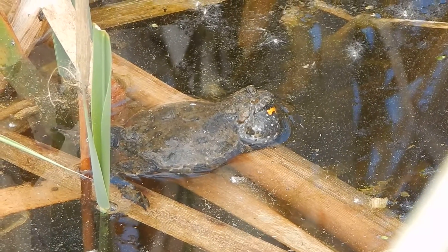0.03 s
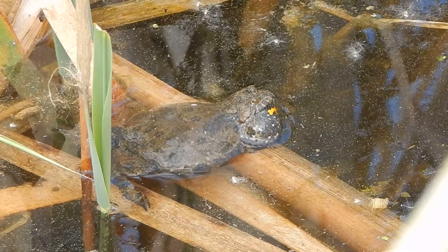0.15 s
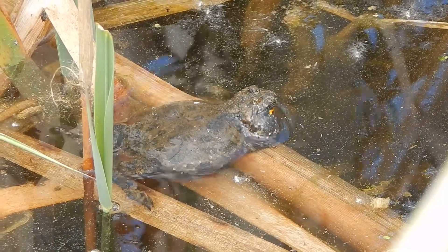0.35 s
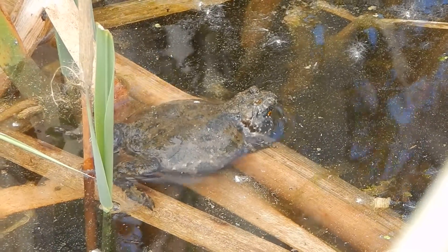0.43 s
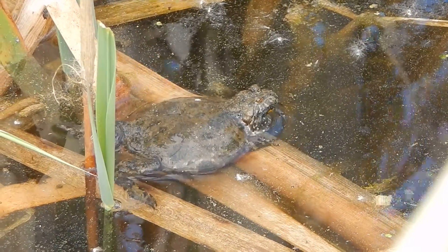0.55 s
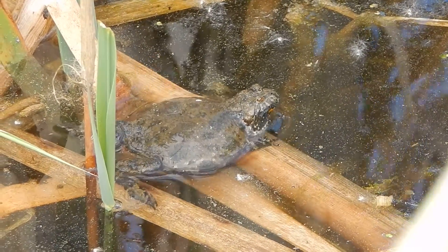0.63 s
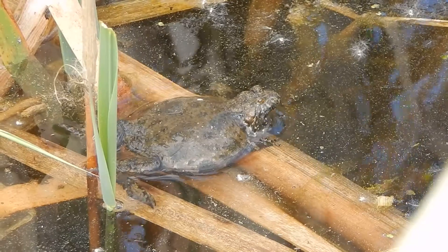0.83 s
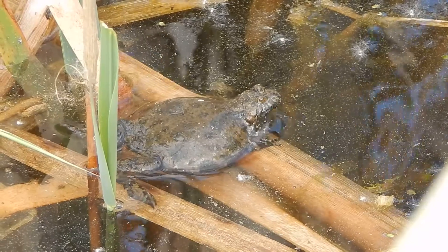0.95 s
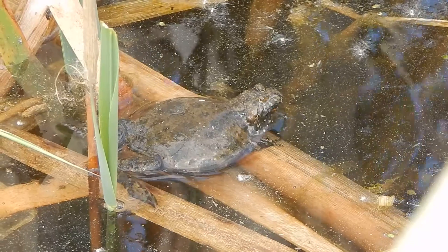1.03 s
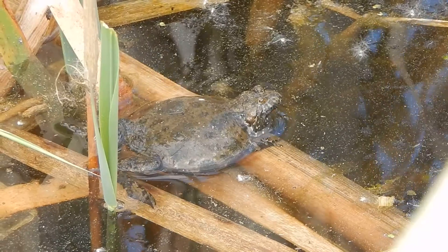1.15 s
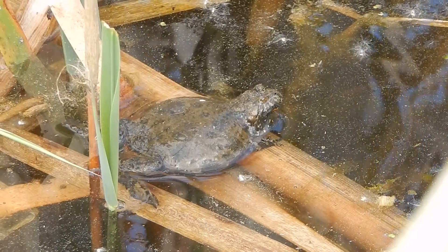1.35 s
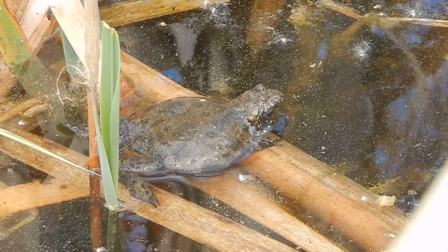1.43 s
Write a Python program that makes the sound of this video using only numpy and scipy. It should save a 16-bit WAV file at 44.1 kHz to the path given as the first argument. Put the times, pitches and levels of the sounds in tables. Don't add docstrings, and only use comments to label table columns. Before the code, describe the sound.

A near toad gives one short, pure, slightly falling hoot, while many softer toads hoot and beat together around a reedy pond; a songbird whistles faintly early on, a wading bird yelps, stereo outdoor pickup.

```python
import sys
import numpy as np
from scipy import signal
from scipy.fft import rfft, irfft, next_fast_len
from scipy.io import wavfile
from scipy.ndimage import uniform_filter1d, map_coordinates

SR = 44100
rng = np.random.default_rng(int(sys.argv[2]) if len(sys.argv) > 2 else 0)


def field_ratio(decibels):
    return 10 ** (np.asarray(decibels, dtype=float) / 20)


def output_pcm(signal):
    pcm = np.clip(np.atleast_2d(signal).T, -1, 1) * 32767
    wavfile.write(sys.argv[1], SR, np.round(pcm).astype(np.int16))


N = 66150
TIME = np.arange(N) / SR


def unit(x):
    return x / np.sqrt(np.mean(x ** 2) + 1e-20)


def along(points, hz):
    f, value = np.transpose(points)
    return np.interp(np.log(hz + 1), np.log(f + 1), value)


def wobble(rate):
    knots = rng.standard_normal(int(N * rate / SR) + 4)
    return map_coordinates(knots, [TIME * rate])


def filtered(x, response):
    m = next_fast_len(N + 8192)
    spectrum = rfft(x, m) * response(np.fft.rfftfreq(m, 1 / SR))
    return irfft(spectrum, m)[..., :N]


def placed(x, lag_s, lean_db=0):
    side = np.array([[1], [-1]]) / 2
    return field_ratio(side * lean_db) * filtered(x, lambda hz: np.exp(-2j * np.pi * hz * lag_s * side))


def gate(start, end, fade):
    nearest_edge = np.minimum(TIME - start, end - TIME)
    return np.sin(np.pi / 2 * np.clip(nearest_edge / fade, 0, 1)) ** 2


def track(rows, fade):
    s, hz, db = np.transpose(rows)
    start, end = s[0] - fade, s[-1] + fade
    pitch = uniform_filter1d(np.interp(TIME, s, hz), size=200)
    phase = 2 * np.pi * np.cumsum(pitch * (TIME >= start)) / SR
    gain = np.sqrt(2) * field_ratio(np.interp(TIME, s, db)) * gate(start, end, fade)
    return phase, gain


# (frequency [Hz], likeness [0 to 1])
LIKENESS = [(60, .88), (300, 0.6), (700, 0.62), (1900, 0.74), (3100, .25), (6000, .05), (15000, .01)]


def rush(spectrum, patchy_db):
    grid = signal.stft(rng.standard_normal((2, N + 512)), nperseg=512)[2]
    patches = rng.standard_normal(grid.shape[1:])
    patches = uniform_filter1d(patches, size=5, axis=0)
    patches = unit(uniform_filter1d(patches, size=6, axis=1))
    pair = signal.istft(grid * field_ratio(patchy_db * patches), nperseg=512)[1][:, :N]

    def response(hz):
        turn = np.arccos(np.clip(along(LIKENESS, hz), 0, 1)) / 2
        return field_ratio(along(spectrum, hz)) * np.array([np.cos(turn), np.sin(turn)])

    mid, side = filtered(pair, response)
    return unit(placed(np.array([mid + side, mid - side]), lag_s=5e-5))


# (time [s], pitch [Hz], level [dB rms])
NEAR_NOTE = [
    (0.307, 510.4, -32.0),
    (0.322, 512.9, -24.0),
    (0.35, 507.9, -20.0),
    (0.4, 498.8, -19.0),
    (0.44, 492.9, -19.5),
    (0.49, 488.7, -22.0),
    (0.535, 487.6, -23.5),
    (0.552, 480.2, -30.5),
]
# (multiple of the note [x], level [dB rms], drift [dB/s], swell time [s], lean right [dB])
NEAR_OVERTONES = [(2, -43.5, -29, 0.011, 1), (3, -51.5, -9, 0.028, 1.5), (4, -51, -12, 0.045, 2),
                  (5, -73.5, -6, .04, 3.5), (6, -65, -49.5, .03, 6), (7, -76, -21.5, 0.026, 1.5)]


def near_toad():
    buzz_from_s, buzz_to_s, open_s, close_s = .305, .554, .008, .028
    waver_hz, waver_db, grain_db = .15, .7, .45
    phase, gain = track(NEAR_NOTE, fade=.012)
    phase = phase + 2 * np.pi * np.cumsum(waver_hz * wobble(30)) / SR * (gain > 0)
    out = placed(gain * np.sin(phase), 1e-5, .6)
    since = np.clip(TIME - buzz_from_s, 0, None)
    buzzing = np.sqrt(2) * gate(buzz_from_s, 1, open_s) * gate(0, buzz_to_s, close_s)
    for multiple, db, drift_db, swell_s, lean_db in NEAR_OVERTONES:
        level = db + drift_db * since + waver_db * wobble(25) + grain_db * multiple * wobble(150)
        swell = 1 - np.exp(-since / swell_s)
        tone = buzzing * field_ratio(level) * swell * np.sin(multiple * phase)
        out = out + placed(tone, 1e-5, -lean_db)
    return out


def hoot(start, length, hz, db, tones, roundness):
    sag, sag_s = .06, .12
    u = np.clip(TIME - start, 0, length)
    phase = 2 * np.pi * hz * (u + sag * sag_s * (1 - np.exp(-u / sag_s)))
    swell = np.abs(np.sin(np.pi * u / length)) ** roundness * (TIME < start + length)
    return swell * sum(field_ratio(db + tone_db) * np.sin(multiple * phase) for multiple, tone_db in tones)


# (start [s], length [s], resting pitch [Hz], peak level [dB])
POND_HOOTS = [(-0.0754, 0.32, 455, -43.0), (-0.063, 0.16, 488, -43.5), (-0.0314, 0.32, 467, -38.5),
              (0.0283, 0.33, 479, -37.5), (0.0601, 0.33, 452, -46.0), (0.0605, 0.14, 436, -42.5),
              (0.0759, 0.15, 467, -46.5), (0.136, 0.32, 452, -34.5), (0.2098, 0.32, 434, -45.5),
              (0.2235, 0.15, 479, -35.5), (0.2257, 0.15, 455, -33.5), (0.2392, 0.19, 488, -35.5),
              (0.2397, 0.17, 465, -31.5), (0.255, 0.14, 509, -40.5), (0.3307, 0.33, 470, -38.5),
              (0.3446, 0.33, 464, -34.5), (0.3595, 0.16, 448, -30.5), (0.3745, 0.33, 482, -40.0),
              (0.4051, 0.25, 449, -43.5), (0.5553, 0.33, 452, -48.5), (0.5705, 0.19, 506, -44.0),
              (0.5825, 0.32, 488, -53.0), (0.6314, 0.33, 491, -50.5), (0.6323, 0.15, 473, -39.5),
              (0.7955, 0.23, 451, -41.5), (0.797, 0.33, 491, -45.5), (0.8543, 0.13, 453, -47.5),
              (0.8543, 0.31, 479, -51.5), (0.8555, 0.27, 464, -35.5), (0.9159, 0.25, 467, -42.5),
              (0.9297, 0.26, 482, -50.0), (0.9599, 0.24, 450, -44.5), (0.9705, 0.21, 488, -44.0),
              (1.035, 0.15, 506, -47.5), (1.0654, 0.21, 466, -36.0), (1.1396, 0.2, 443, -41.0),
              (1.1405, 0.25, 449, -47.0), (1.1704, 0.15, 495, -41.0), (1.1855, 0.2, 464, -32.5),
              (1.2441, 0.29, 449, -46.0), (1.2603, 0.33, 509, -45.0), (1.2738, 0.15, 479, -48.0),
              (1.2748, 0.15, 468, -46.5), (1.2871, 0.23, 500, -53.0), (1.4242, 0.28, 470, -40.5),
              (1.4258, 0.33, 452, -35.0)]
# (frequency [Hz], level [dB])
FAR_BLUR = [(370, -23), (395, -10.5), (425, -28.5), (450, -2.5), (500, -3.5), (550, -14.5)]


def neighbours():
    out = field_ratio(-49) * rush([(300, -120)] + FAR_BLUR + [(600, -34.5), (750, -120)], patchy_db=3.0)
    for row in POND_HOOTS:
        voice = hoot(*row, [(1, 0), (2, -44.5)], roundness=.6)
        lag_s = 7e-5 + 3e-5 * rng.standard_normal()
        lean_db = 1.6 + 1.6 * rng.standard_normal()
        out = out + placed(voice, lag_s, lean_db)
    return out


# (start [s], length [s], resting pitch [Hz], peak level [dB])
SMALL_HOOT = (1.159, .195, 578, -46)
# (multiple of the pitch [x], level [dB])
SMALL_TONES = [(1, 0), (2, -11.5), (3, -23)]


def small_toad():
    fade_db_per_s = -30
    voice = hoot(*SMALL_HOOT, SMALL_TONES, roundness=.12)
    return placed(voice * field_ratio(fade_db_per_s * (TIME - SMALL_HOOT[0])), 1.3e-4, 2.1)


# (time [s], pitch [Hz], level [dB rms])
RISING_WHISTLE = [(0, 3410, -65), (.06, 3615, -64.5), (.092, 3810, -64), (.105, 4060, -57),
                  (.116, 4550, -52), (.128, 5280, -59), (.136, 4600, -72)]
DROPPING_WHISTLE = [(.186, 5800, -63.5), (.191, 4860, -59), (0.195, 4430, -60), (0.201, 3800, -68)]
WARBLED_WHISTLE = [(.298, 4050, -65.5), (.317, 4300, -66.5), (.404, 4180, -62.5), (0.421, 4050, -59),
                   (.433, 3880, -64.5), (.452, 4250, -64), (.464, 4090, -60.5), (.478, 3820, -65),
                   (0.527, 3670, -65.5)]
CHIP_NOTE = [
    (.555, 4020, -66),
    (.567, 4110, -62.5),
    (.579, 4020, -64),
    (.588, 3700, -76),
]
# (start [s], lowest pitch [Hz], level [dB rms])
TRILL_NOTES = [
    (0.133, 5270, -52),
    (.151, 5600, -55.5),
    (0.166, 5600, -54),
]


def songbird():
    trill_s, dip_at, bend_hz = .014, .42, 2200
    echo_s, echo_db = .006, -20
    song = np.zeros(N)
    for rows in (RISING_WHISTLE, DROPPING_WHISTLE, WARBLED_WHISTLE, CHIP_NOTE):
        phase, gain = track(rows, fade=.0013)
        song = song + gain * np.sin(phase)
    for start, hz, db in TRILL_NOTES:
        u = np.clip((TIME - start) / trill_s, 0, 1)
        scoop = 2 * np.pi * np.cumsum(hz + bend_hz * (u - dip_at) ** 2) / SR
        gain = np.sqrt(2) * field_ratio(db - 18 * np.abs(u - dip_at)) * gate(start, start + trill_s, .003)
        song = song + gain * np.sin(scoop)
    direct = placed(song * field_ratio(.8 * wobble(60)), .99e-4, -2.1)
    return direct + field_ratio(echo_db) * np.roll(song, round(echo_s * SR))


# (start [s], top pitch [Hz], level [dB rms], stretch in time [x])
WADER_CALLS = [
    (.101, 1105, -55, 1),
    (.797, 1140, -59, .74),
    (1.225, 1085, -59.5, .85),
]
# (time [s], pitch over top [x], level [dB])
YELP_SHAPE = [
    (0, 0.94, -4),
    (.009, .99, 0.5),
    (.021, 1, 2),
    (.034, .96, -1),
    (.05, 0.85, -7),
    (.065, .81, -10),
    (.09, .81, -10),
    (.12, .8, -17),
]
# (multiple of the pitch [x], level [dB], lean right [dB], share of the fading [x])
YELP_PARTIALS = [(2, 0, 2, 1.01), (3, -7.5, 0, .9)]


def wader():
    out = np.zeros((2, N))
    for start, hz, db, stretch in WADER_CALLS:
        rows = [(start + u * stretch, hz * bend, db + shape_db) for u, bend, shape_db in YELP_SHAPE]
        phase, gain = track(rows, fade=.002)
        phase = phase + .12 * wobble(250)
        for multiple, tone_db, lean_db, share in YELP_PARTIALS:
            level = field_ratio(tone_db + 2.2 * wobble(90)) * gain ** share * field_ratio(db) ** (1 - share)
            out = out + placed(level * np.sin(multiple * phase), 8e-5, -lean_db)
    return out


# (time [s], peak level [dB], centre frequency [Hz])
FAR_CROAKS = [(0.046, -58, 1890), (.558, -56.5, 2130), (0.629, -58, 2370), (1.275, -64, 1800),
              (1.38, -58, 960), (.71, -66.5, 2380), (0.75, -64, 1988), (.825, -58.5, 930),
              (0.867, -56, 1800), (.9, -62.5, 2015), (0.998, -64, 1900), (1.065, -54.5, 1900),
              (1.139, -61, 2070), (1.214, -63, 1974), (1.4, -66, 1870)]


def croaks():
    rate_hz, width, roughness, croak_s = 110, .12, 1.1, .038
    out = np.zeros(N)
    for s, db, hz in FAR_CROAKS:
        clicks = np.cos(np.pi * rate_hz * (TIME - s)) ** 4
        band = filtered(rng.standard_normal(N), lambda f: np.exp(-((f / hz - 1) / width) ** 2))
        envelope = (roughness + clicks) * gate(s - .004, s - .004 + croak_s, croak_s / 3)
        out = out + field_ratio(db - 9.5) * unit(band) * envelope
    return placed(out, 5e-5, -2.1)


# (time [s], peak level [dB], centre frequency [Hz], time to fade by 60 dB [s])
REED_TICKS = [(.1007, -64, 9250, 0.025), (.772, -65, 9400, .02), (.7846, -62.5, 9550, 0.03),
              (.7846, -68, 6560, 0.023), (.866, -65.5, 8540, .03), (.96, -68, 10750, 0.044),
              (1.255, -64.5, 10200, 0.044), (1.3713, -61.5, 9000, 0.06), (1.3713, -67, 13060, 0.034),
              (1.379, -65, 10000, .04), (1.4207, -63, 14300, .015), (1.4207, -62.5, 10700, .03)]


def reeds():
    out = np.zeros((2, N))
    for s, db, hz, t60 in REED_TICKS:
        since = TIME - s
        noise = rng.standard_normal((2, N))
        band = unit(filtered(noise, lambda f: np.exp(-(np.log(f / hz + 1e-9) / .19) ** 2)))
        decay = field_ratio(db - 3 - 60 * np.clip(since, 0, 1) / t60) * (since >= 0)
        out = out + decay * band
    return out


# (frequency [Hz], level [dB])
AIR_SPECTRUM = [(360, -33), (620, 0), (880, -7.5), (1680, -5.5), (2140, -5.5), (2350, -10.5), (2950, -12.5),
                (3570, -14.5), (15500, -29)]


def marsh_air():
    return field_ratio(-62) * rush(AIR_SPECTRUM, patchy_db=0.0)


# (frequency [Hz], level [dB])
ROAD_SPECTRUM = [(15, -41.5), (30, -11), (55, -4), (100, -4.5), (172, -10.5), (351, -13), (420, -12.5),
                 (600, -44.5), (920, -120)]
# (time [s], level [dB rms])
ENGINE_LEVEL = [
    (0, -65),
    (0.069, -51),
    (.15, -76.5),
    (.7, -65),
    (.79, -53),
    (0.949, -60),
    (1.1, -67.5),
    (1.5, -68),
]


def road():
    engine_hz, waver_hz = 100.8, 3
    s, db = np.transpose(ENGINE_LEVEL)
    phase = 2 * np.pi * np.cumsum(engine_hz + waver_hz * wobble(11)) / SR
    engine = np.sqrt(2) * field_ratio(np.interp(TIME, s, db) - 3) * np.sin(phase)
    return field_ratio(-56 + wobble(5)) * rush(ROAD_SPECTRUM, patchy_db=1.15) + engine


def scene():
    toads = near_toad() + neighbours() + small_toad()
    animals = toads + songbird() + wader() + croaks()
    return animals + reeds() + marsh_air() + road()


def roll_off(x):
    return signal.sosfilt(signal.butter(12, 15735, fs=SR, output="sos"), x)


def record(dry):
    top_hz = 15720
    mix = filtered(dry, lambda hz: hz < top_hz)
    return roll_off(mix)


dry = scene()
out = record(dry)
output_pcm(out)
```